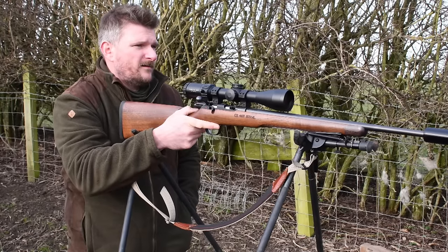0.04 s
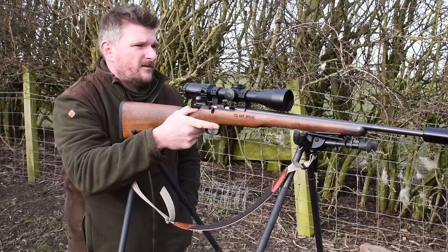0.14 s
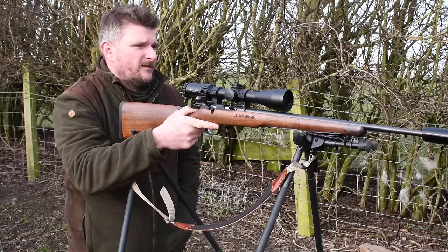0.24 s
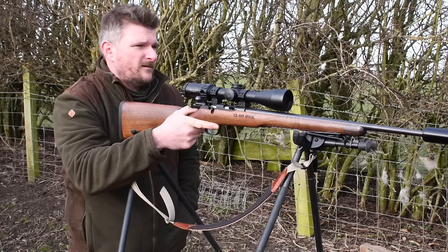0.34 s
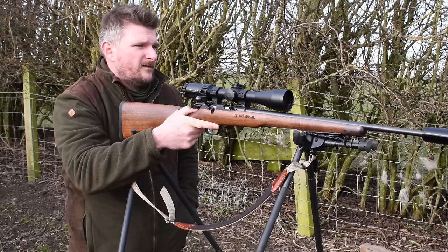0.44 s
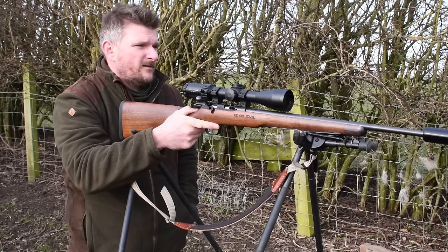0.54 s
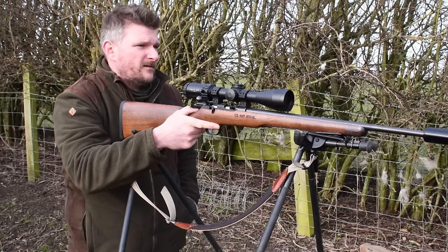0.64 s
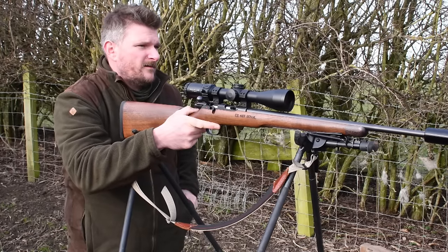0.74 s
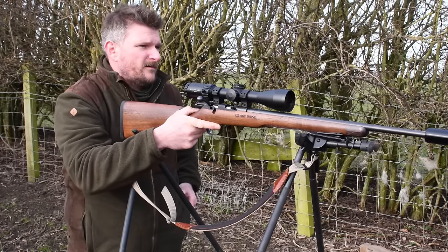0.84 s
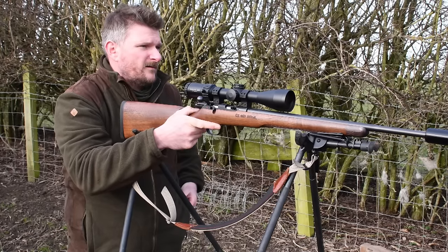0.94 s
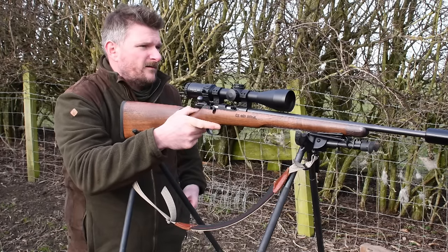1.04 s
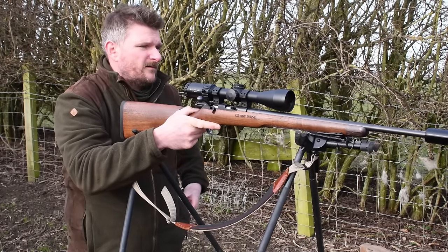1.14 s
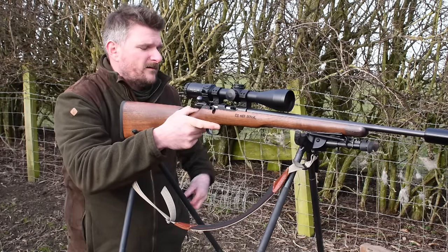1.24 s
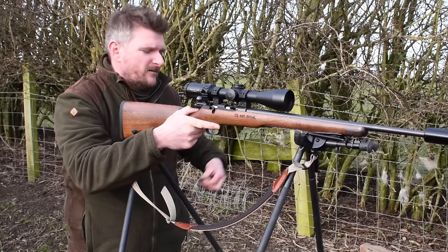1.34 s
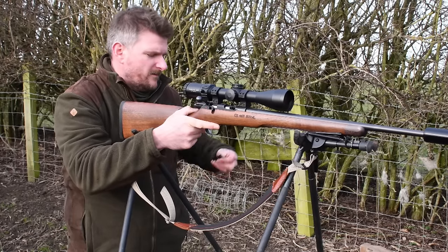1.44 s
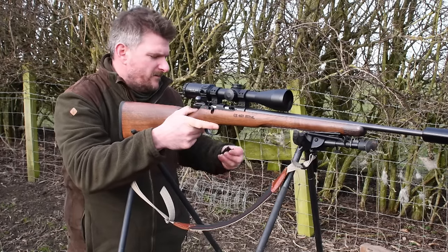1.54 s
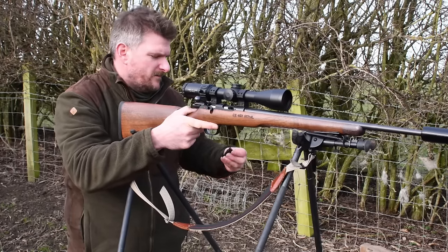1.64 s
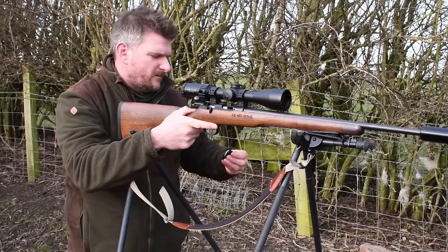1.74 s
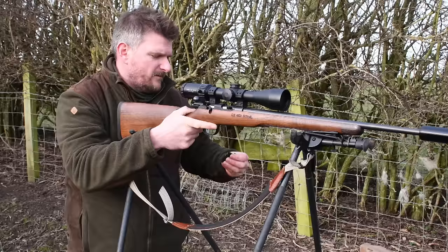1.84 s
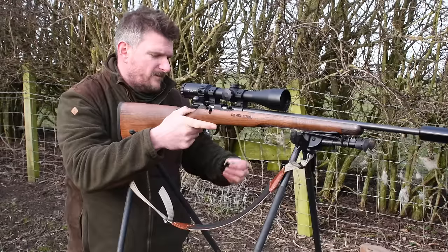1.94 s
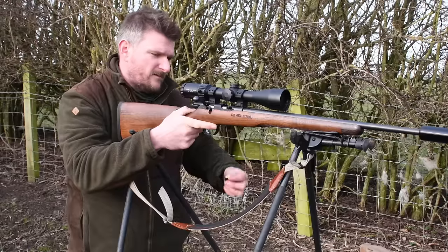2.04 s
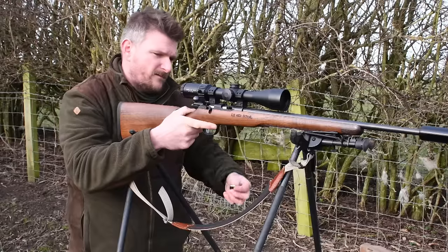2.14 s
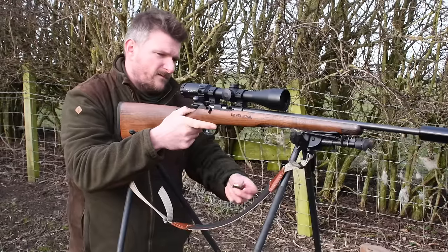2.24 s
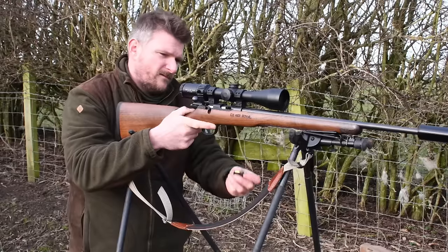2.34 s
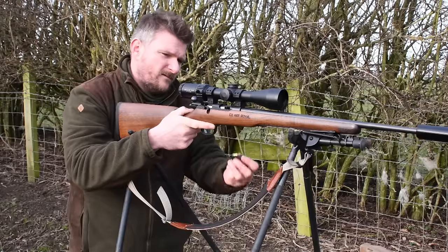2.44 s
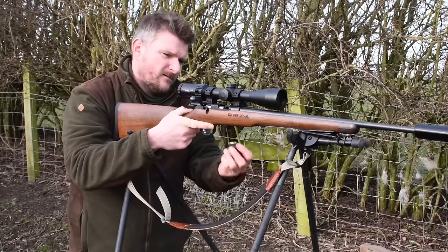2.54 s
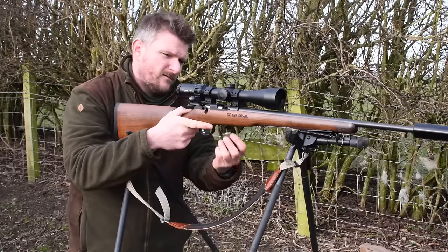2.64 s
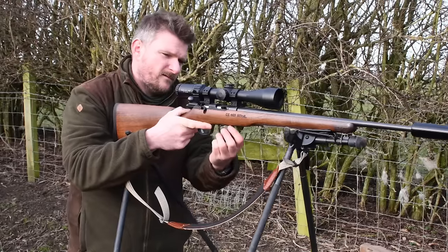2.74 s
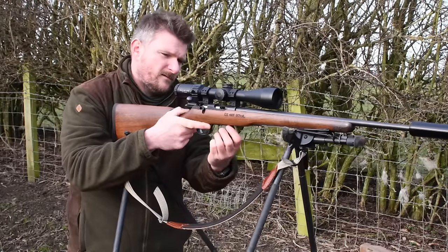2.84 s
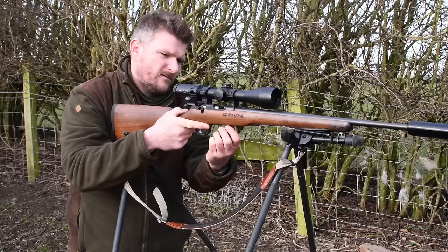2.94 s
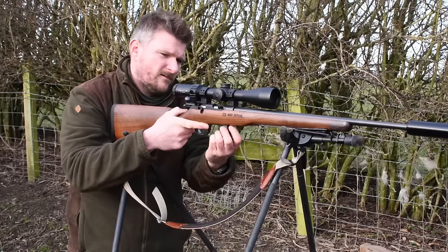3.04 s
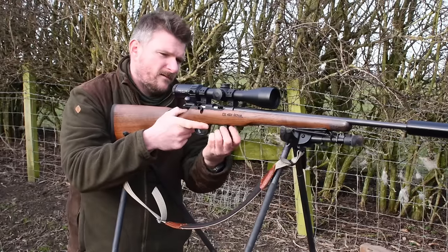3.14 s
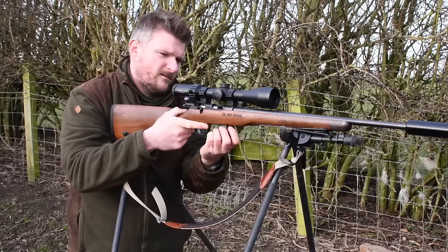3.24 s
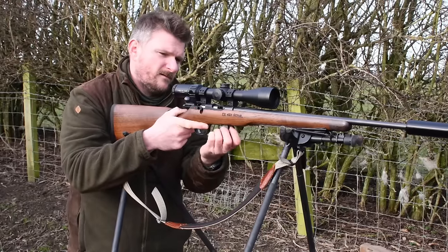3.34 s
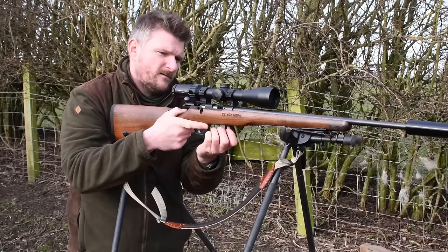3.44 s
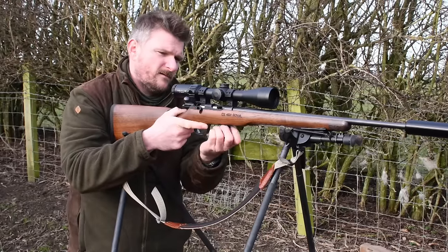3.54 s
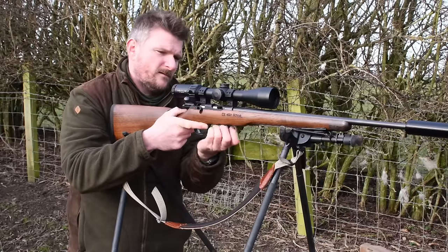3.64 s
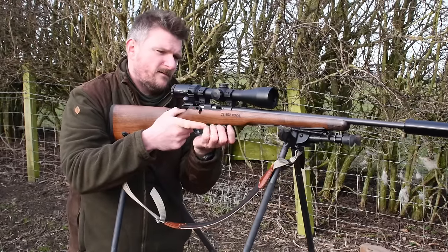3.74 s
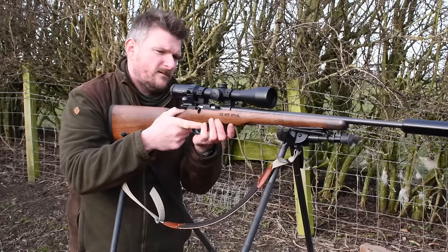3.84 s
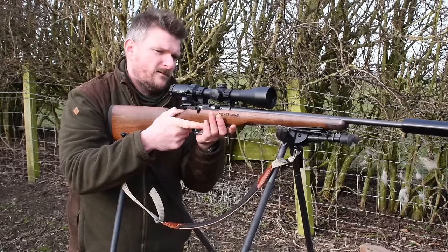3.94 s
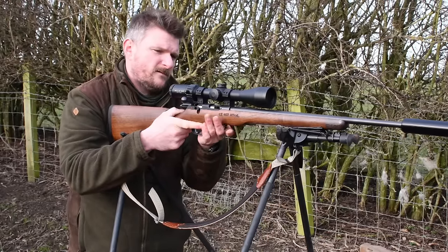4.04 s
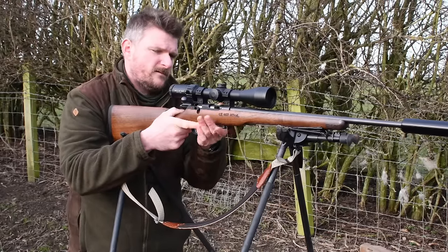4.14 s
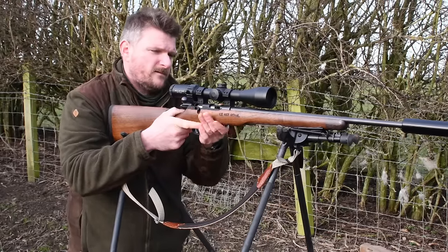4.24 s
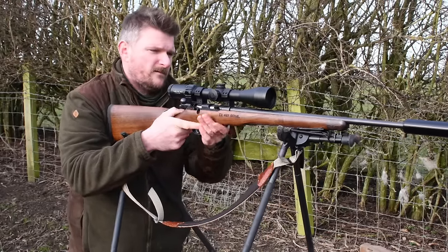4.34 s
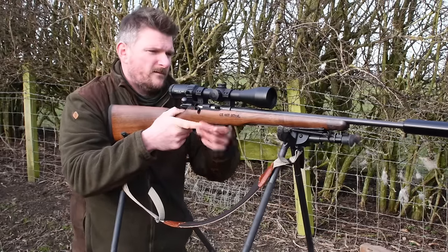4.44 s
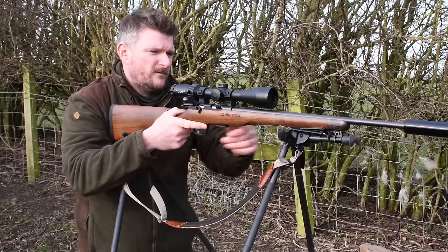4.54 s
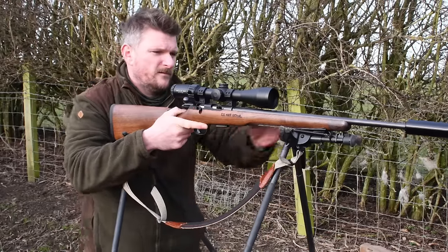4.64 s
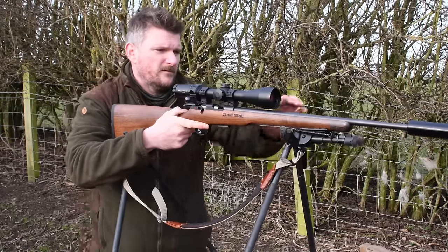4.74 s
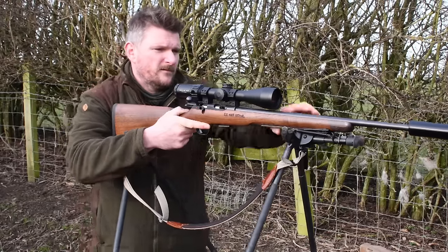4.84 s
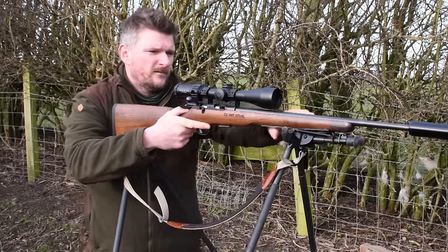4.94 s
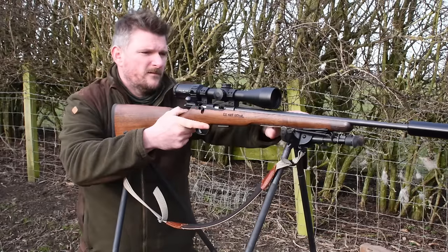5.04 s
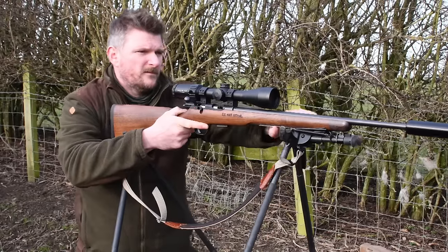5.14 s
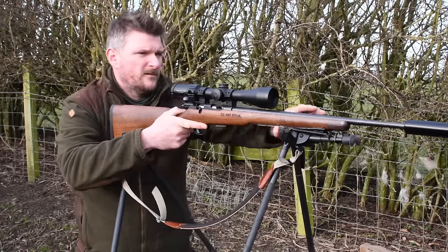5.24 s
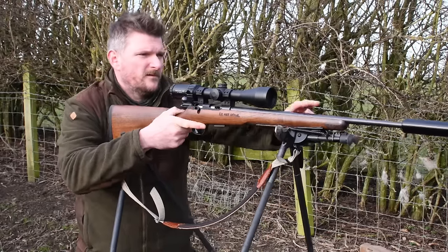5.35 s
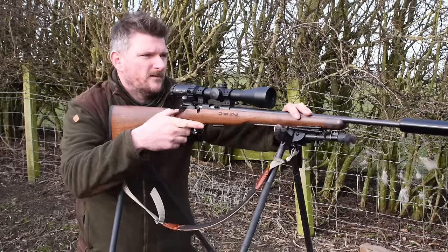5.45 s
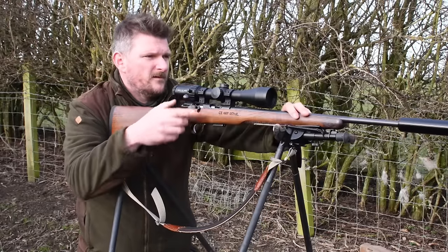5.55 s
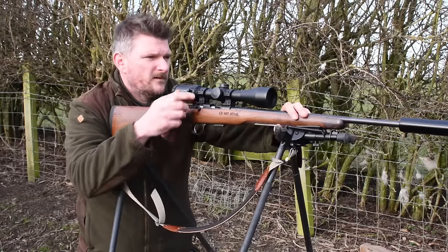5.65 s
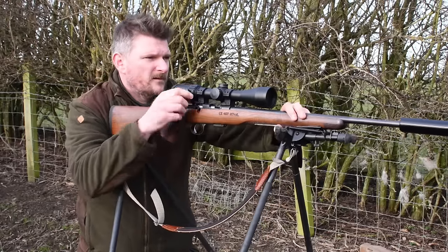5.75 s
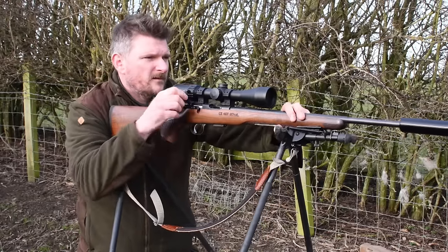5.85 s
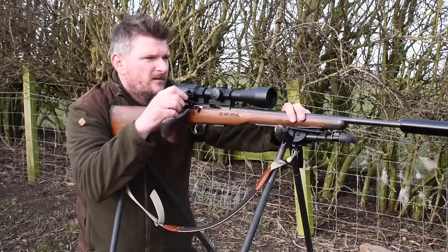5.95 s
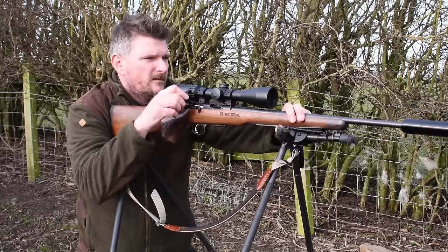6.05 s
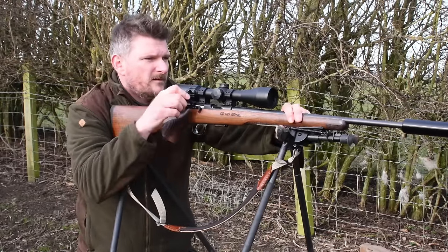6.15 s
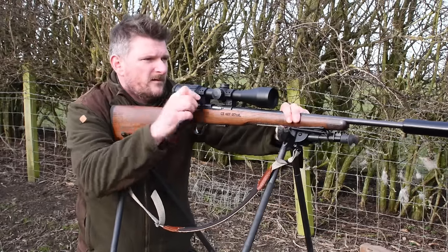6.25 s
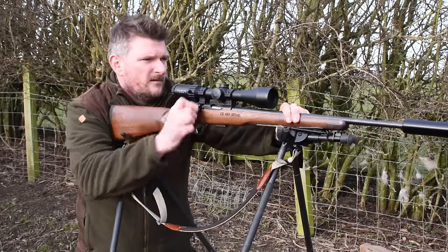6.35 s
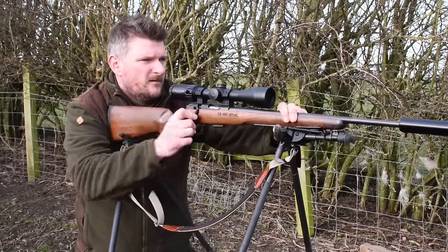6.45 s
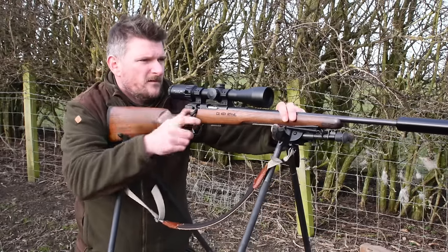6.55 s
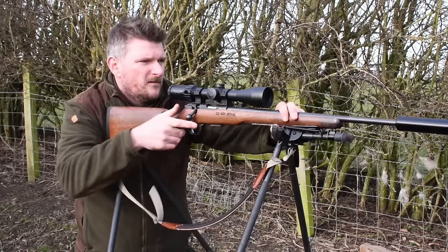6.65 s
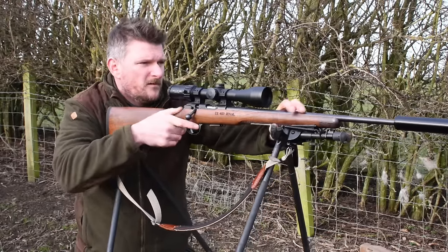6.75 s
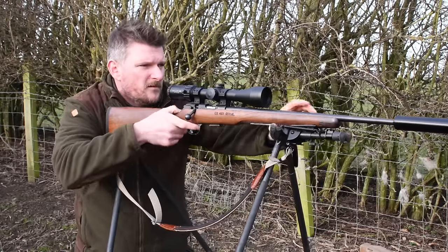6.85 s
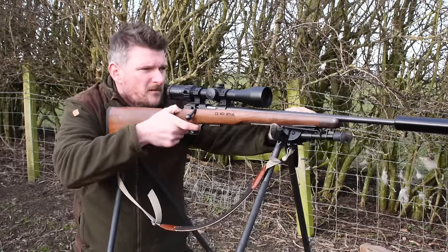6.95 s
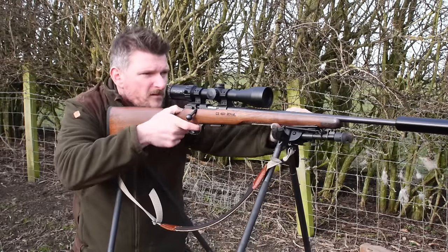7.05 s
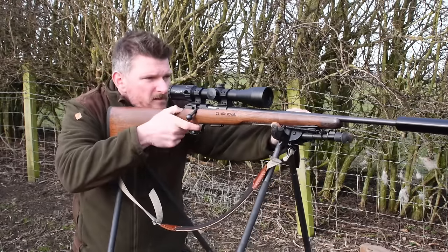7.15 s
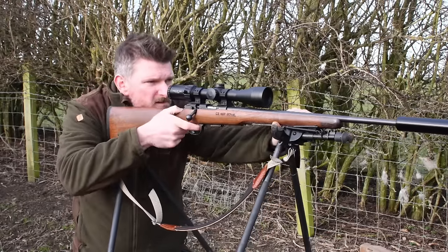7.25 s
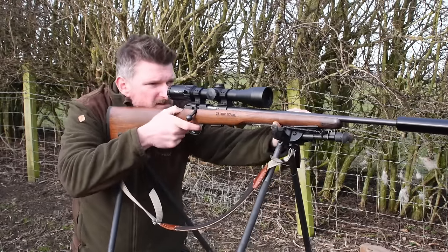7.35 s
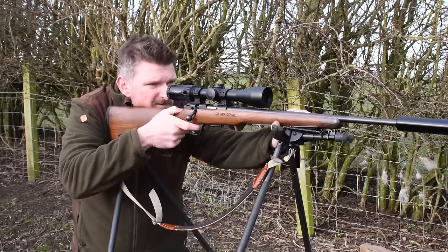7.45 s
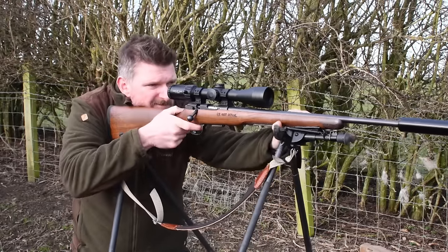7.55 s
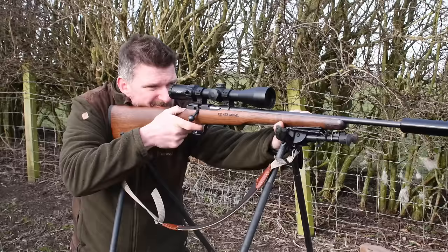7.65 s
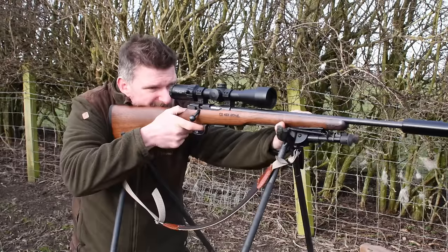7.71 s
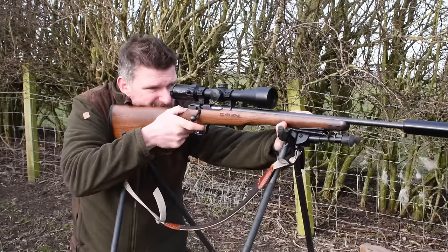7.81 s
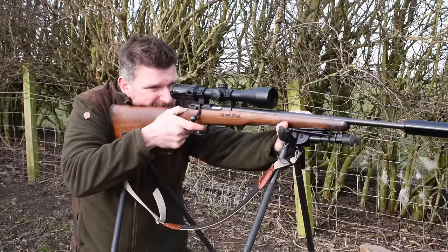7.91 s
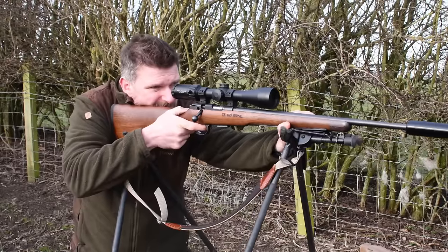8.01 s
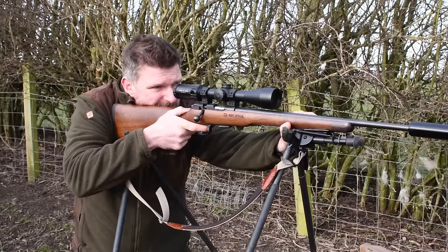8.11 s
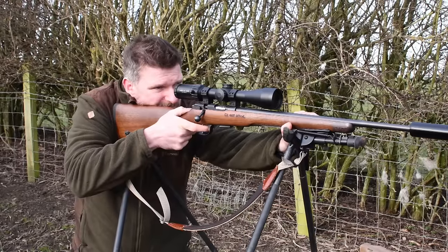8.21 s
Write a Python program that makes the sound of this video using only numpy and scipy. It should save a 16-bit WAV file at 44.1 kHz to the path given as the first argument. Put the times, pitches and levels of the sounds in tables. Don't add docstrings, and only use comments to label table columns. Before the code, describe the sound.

Close stereo microphones catch delicate metal handling in open air: tiny ticks, dull pocket clunks, thin scrapes and fumbling, then a bright latch snap. Hands brush the gun; a loud steel clack marks the bolt reaching its rear stop, followed by a short scrape, a sharp slam and a lighter handle knock. Short ground and hedge reflections surround them, above soft cloth rustle and low traffic. No shot is heard.

```python
import sys
import numpy as np
from scipy import signal
from scipy.fft import rfft, irfft, next_fast_len
from scipy.io import wavfile
from scipy.ndimage import uniform_filter1d

SR = 44100
rng = np.random.default_rng(int(sys.argv[2]) if len(sys.argv) > 2 else 0)


def generate_wav(sig):
    pcm = np.round(np.clip(np.atleast_2d(sig).T, -1, 1) * 32767).astype(np.int16)
    wavfile.write(sys.argv[1], SR, pcm)


def nominal_scale(level):
    x = np.asarray(level, float) / 20
    return 10 ** x


N = 365148

# start_s, level_db, pitch_hz, focus_db
ROUNDS = [
    (0.1621, -56, 4000, 4),
    (0.1665, -57.5, 3500, 2.7),
    (0.2835, -59, 2930, 3),
    (0.2945, -62, 2400, 2.6),
]
# start_s, level_db, pitch_hz, focus_db
POCKET = [
    (0.5246, -57, 1400, 4),
    (0.7535, -48.5, 930, 9.5),
    (0.7575, -47, 750, 7),
    (0.7825, -51.5, 1190, 7),
    (0.7952, -50, 1600, 4.4),
    (0.8, -56, 700, 7),
    (1.2091, -67, 1150, 3),
    (1.3431, -66, 3480, 2.4),
    (1.392, -57.5, 5000, 5),
]
# start_s, level_db, pitch_hz, focus_db
FUMBLE = [(2.8598, -53, 3050, 5), (3.0336, -49.5, 1400, 4.2), (3.0876, -60, 2380, 1.8),
          (3.2702, -68, 3360, 1), (3.4202, -54.5, 2820, 4.7), (3.6251, -55, 2140, 2.1),
          (3.6386, -45, 2200, 1.1), (3.6525, -57, 5000, 3), (3.6618, -51, 1600, 9.4),
          (3.7095, -60, 1040, 7), (3.8012, -54, 1310, 4.4), (3.8216, -53, 3730, 6.1)]
# start_s, level_db, pitch_hz, focus_db
SEATING = [
    (3.9645, -70, 3480, 4),
    (3.9903, -55, 3030, 1.3),
    (4.0078, -67, 2500, 2.6),
    (4.0622, -59, 4000, 1),
    (4.0678, -56, 1930, 3.6),
    (4.07, -63, 3000, 2),
    (4.2354, -59, 1870, 7.5),
    (4.2432, -48, 2280, 3.6),
]
# start_s, level_db, pitch_hz, focus_db
LATCH = [
    (4.3222, -59, 3140, 5),
    (4.3267, -55, 2300, 4),
    (4.3512, -42.5, 4500, 0),
    (4.3524, -47, 2500, 2),
    (4.3605, -55.5, 3500, -1),
    (4.3686, -26, 4800, 1.5),
    (4.3758, -46, 7500, 3),
]
# start_s, level_db, pitch_hz, focus_db
GRIP = [(4.5897, -56.5, 6500, 1.5), (4.8122, -63, 7500, 2.3), (4.812, -60, 650, 8.8), (4.836, -67, 6500, 3),
        (4.8841, -61, 2140, 4.7), (4.8905, -60, 7500, 2), (4.9065, -61, 5000, 0.91),
        (4.9195, -55, 2550, 2.5), (4.9255, -56, 3000, 1.7), (5.0844, -66, 4500, 3), (5.2124, -65, 7500, 4),
        (7.9073, -50, 1900, 10.7)]
# start_s, level_db, pitch_hz, focus_db
BOLT_BACK = [
    (5.8293, -51, 1570, 3.9),
    (5.9069, -55.5, 1500, 11),
    (5.9219, -44, 1927, 3.4),
    (5.9308, -36, 3480, 2.6),
    (5.9361, -50, 3610, 3.0),
    (5.9415, -52.5, 3000, 5),
    (5.9518, -58, 6000, 1.5),
    (5.9571, -30, 3490, 2.3),
    (5.9586, -17, 2460, 2.96),
]
# start_s, level_db, pitch_hz, focus_db
BOLT_START = [
    (6.2687, -40.5, 2580, 8.5),
    (6.2708, -46.5, 2200, 8),
    (6.2887, -44.5, 2500, 12),
]
# start_s, level_db, pitch_hz, focus_db
BOLT_HOME = [(6.3078, -45.5, 7000, 2), (6.3056, -40.5, 6500, 1.5), (6.3152, -40, 2400, 4.9),
             (6.321, -39, 5000, 2), (6.3224, -30, 3000, 3.4), (6.3248, -36, 2600, 3.5),
             (6.3288, -38, 2500, 5), (6.3386, -38, 5000, 1), (6.3441, -17.5, 3700, 1.9),
             (6.3455, -23, 3200, 3), (6.3466, -25, 2800, 3)]
# start_s, level_db, pitch_hz, focus_db
HANDLE_DOWN = [
    (6.4383, -42.5, 1370, 6.1),
    (6.4601, -58, 1570, 5.4),
    (6.4739, -52, 2860, 5.8),
    (6.5195, -28.5, 3000, 0.77),
]

# start_s, level_db, pitch_hz, length_ms
ROUNDS_SLIDES = [
    (0.167, -63, 2800, 50),
    (0.245, -59, 2600, 32.2),
    (0.274, -56, 2400, 26),
    (0.3, -64.5, 1930, 40),
]
# start_s, level_db, pitch_hz, length_ms
POCKET_SLIDES = [
    (0.515, -64.5, 1150, 25),
    (0.746, -60, 1100, 8),
    (0.76, -66, 1800, 13),
    (0.784, -56.5, 850, 30),
    (0.813, -59.5, 900, 27),
    (0.84, -67, 900, 30),
    (1.35, -65, 900, 67),
]
# start_s, level_db, pitch_hz, length_ms
FUMBLE_SLIDES = [(2.9, -73.5, 1000, 100), (3.13, -67.5, 1040, 54), (3.19, -78, 1740, 120),
                 (3.405, -63.5, 1050, 27), (3.49, -60, 1060, 63), (3.54, -69, 810, 33),
                 (3.642, -52, 1800, 7.7), (3.651, -45, 1800, 12.5), (3.667, -67, 1300, 35),
                 (3.738, -64, 1400, 12), (3.753, -65, 850, 11), (3.764, -58, 1260, 13),
                 (3.8, -54.5, 1500, 14), (3.812, -64, 1800, 45), (3.85, -57, 2600, 31),
                 (3.878, -54, 1490, 21), (3.9, -73, 1100, 7.5), (5.43, -73, 1410, 160)]
# start_s, level_db, pitch_hz, length_ms
SEATING_SLIDES = [
    (3.905, -65, 3300, 24),
    (3.935, -63, 4000, 41),
    (3.995, -65, 4000, 30),
    (4.004, -63, 2000, 6.4),
    (4.02, -64.5, 4500, 50),
    (4.06, -55.5, 1800, 15),
]
# start_s, level_db, pitch_hz, length_ms
LATCH_SLIDES = [
    (4.336, -46.5, 1500, 22),
    (4.3425, -46.5, 2400, 12),
    (4.354, -55, 1500, 11.3),
]
# start_s, level_db, pitch_hz, length_ms
GRIP_SLIDES = [
    (4.61, -73, 2500, 130),
    (4.74, -75, 3000, 200),
    (4.885, -58, 2110, 41),
    (4.914, -54.5, 2340, 14),
    (4.94, -71, 2000, 170),
    (5.12, -67, 6000, 62),
    (6.8, -75, 2640, 60),
    (7.55, -70, 1000, 74),
    (7.86, -71.5, 2000, 74),
    (7.99, -74, 4000, 64),
]
# start_s, level_db, pitch_hz, length_ms
BOLT_SLIDES = [
    (6.272, -53.5, 1590, 15),
    (6.288, -54.5, 2400, 18),
    (6.303, -38, 2460, 8.1),
    (6.31, -39.5, 2600, 12),
    (6.324, -38, 2600, 11),
    (6.334, -41, 2800, 12),
]
# start_s, level_db, pitch_hz, length_ms
SQUEAK = [
    (6.648, -62, 1500, 16.5),
]

# pitch_hz, width_hz, level_db
ROUNDS_BODY = [(1150, 210, -6), (1570, 160, 0), (2180, 360, -5), (2800, 250, 2), (3290, 450, -5.5),
               (5100, 400, -3), (6500, 33, 10), (8500, 810, -16)]
# pitch_hz, width_hz, level_db
POCKET_BODY = [(550, 93, -2), (760, 120, -1), (1040, 120, -1), (1300, 84, 4.5), (1570, 150, -2),
               (1820, 200, -7), (2500, 660, -9.5), (4000, 620, -5.5), (5770, 900, -9), (8500, 800, -27)]
# pitch_hz, width_hz, level_db
MAGAZINE_BODY = [(750, 67, 3.5), (898, 58, 5), (1000, 145, 0.5), (1400, 88, 8.5), (1920, 110, -1.5),
                 (3000, 260, -6.5), (4000, 880, -19.5), (5070, 540, -4.5), (6370, 410, -12),
                 (8630, 430, -1.5), (11700, 900, -31)]
# pitch_hz, width_hz, level_db
SEATING_BODY = [(900, 350, -9), (1310, 84, -3), (1900, 99, 3), (2230, 210, -2), (3000, 320, -4.5),
                (3600, 390, -17), (4380, 220, -7), (4920, 320, -5.5), (5530, 240, -7), (6840, 600, -24),
                (8400, 420, -2.5), (9300, 400, -2), (13000, 900, -27)]
# pitch_hz, width_hz, level_db
DRAG_BODY = [(1000, 160, -8), (1400, 120, 1), (1900, 160, 2.5), (3000, 270, -3), (4200, 350, -5),
             (5100, 450, -10), (7700, 500, -8.5), (8700, 500, -5.5)]
# pitch_hz, width_hz, level_db
LATCH_BODY = [(1800, 170, -2.5), (2140, 190, -1.5), (3030, 210, -2.5), (4120, 160, -3.5), (4870, 230, 5),
              (5760, 390, 0), (6510, 290, 4.5), (7500, 270, -15), (9160, 400, -6), (10300, 500, -14.5),
              (12330, 550, -3), (13000, 400, 0.5),
              (770, 150, -17), (1330, 130, -11), (1530, 80, -13), (2420, 220, -4), (8350, 250, -10),
              (6503, 35, -10), (6550, 41, -6.5), (8230, 45, -20.5), (4400, 220, -9), (11500, 300, -15),
              (14200, 300, -15)]
# pitch_hz, width_hz, level_db
GRIP_BODY = [(680, 530, 5), (1400, 380, -3.5), (2200, 1150, 0.5), (3200, 2700, -6), (4970, 940, -6),
             (6500, 2000, -11), (8600, 670, -7)]
# pitch_hz, width_hz, level_db
BACK_BODY = [(1914, 66, -0.5), (2430, 200, 2), (3000, 440, 1.5), (5200, 96, -8), (7540, 290, -24),
             (8400, 310, -7.5), (9700, 550, -25), (10300, 230, -21), (11000, 280, -31), (11900, 210, -28.5),
             (13050, 250, -14), (14500, 270, -30.5),
             (727, 87, 1.5), (920, 90, -12.5), (1090, 64, -11.5), (1330, 42, -2.5), (1520, 78, -6),
             (2186, 150, -6.5), (3420, 53, -4), (3540, 32, -2.5), (4190, 200, -1.5), (4500, 500, -5),
             (5670, 150, -12), (5930, 150, -10.5), (6600, 400, -21)]
# pitch_hz, width_hz, level_db
HOME_BODY = [(1930, 110, -6.5), (2650, 160, 0), (3066, 120, 2), (3910, 100, -0.5), (4420, 230, -3),
             (5000, 220, 0.5), (6500, 250, -7.5), (8330, 250, -5), (10150, 110, -20.5), (11900, 540, -15.5),
             (12900, 420, -17), (14500, 440, -13),
             (742, 96, -10.5), (960, 100, -12.5), (1300, 130, -12), (1500, 52, -8), (2140, 200, -9.5),
             (5527, 150, -1), (6000, 200, -7.5), (7100, 300, -13.5), (7650, 310, -10.5), (8930, 200, -10),
             (9550, 200, -17.5)]
# pitch_hz, width_hz, level_db
DOWN_BODY = [(1236, 190, 4.5), (1450, 250, 4.5), (2070, 105, 1.5), (2380, 95, -2), (2860, 114, -5),
             (4200, 250, -18), (4820, 170, -9), (5530, 310, -10.5), (6100, 200, -13), (7550, 303, -7.5),
             (7750, 250, -2.5), (8400, 110, -2), (9550, 350, -21.5), (11800, 500, -22.5),
             (588, 71, 5.5), (810, 100, -1), (3950, 170, -16.5), (6560, 330, -17.5), (13490, 600, -16.5),
             (15000, 300, -28)]
# pitch_hz, width_hz, level_db
SQUEAK_BODY = [(1500, 96, 4.5), (3980, 270, -22)]

# start_s, pitch_hz, peak_db, t60_s
THUDS = [
    (0.813, 332, -51.5, 0.043),
    (4.922, 310, -51, 0.045),
    (5.961, 265, -43, 0.049),
    (6.344, 259, -44.5, 0.061),
    (6.519, 244.4, -51, 0.068),
]

# low_hz, high_hz
PART_EDGES_HZ = [(480, 1200), (1200, 2800), (2800, 6500), (6500, 15200)]
PART_LAG = [-42, -6, 14, 24]
PART_GAIN_DB = [0.33, 2.2, 1.4, 0.3]

# pitch_hz, level_db
AIR_MID = [(12, -50.5), (20, -21), (26, -42.5), (44, -7), (65, -0.5), (165, -3.5), (314, -11), (361, -12.5),
           (404, -14), (583, -12), (1240, -19.5), (1650, -22.5), (15200, -26), (16500, -40.5)]
# pitch_hz, level_db
AIR_SIDE = [(12, -46.5), (20, -19), (79, -3.5), (184, -3), (251, -2.5), (729, -4.5), (816, -4), (913, -5),
            (1790, -7), (15600, -9.5), (16300, -28.5)]
# start_s, traffic_db, fleece_db
SWELL = [(0, -1, -70.5), (.6, 0, -70.5), (1, -0.5, -76), (1.5, -0.5, -87), (2, -1, -85), (2.6, 0, -75.5),
         (3, -1, -74.5), (4, -0.5, -76.5), (4.5, -1.5, -67), (5.1, 0, -67.5), (5.5, -0.5, -68),
         (5.999, -2, -71), (6.7, 0, -70.5), (7.1, -0.5, -71.5), (7.6, 0.5, -88), (7.999, -1, -68.5),
         (8.28, 2.5, -77.5)]
# pitch_hz, level_db
TYRES = [(200, -26.0), (450, -0.5), (1100, 6.5), (2500, -29.5)]
# pitch_hz, level_db
FLEECE = [(200, -6.0), (900, 1.5), (3000, -5.5), (8000, -12.5), (12000, -42.0)]

MID_DB, SIDE_DB = -60, -65.5
LATCH_MS, BACK_MS, HOME_MS, DOWN_MS, FINGER_MS = 0.42, 0.51, 0.47, 0.4, 0.815
LIGHT_SHARE = 0.17
CATCH, SLIDE_FADE_DB, JERK_DB, SLIDE_FOCUS_DB = 0.67, 1.5, 2.5, 3
FALL_POWER, FALL_BELOW = 1.88, 2.07
GROUND_S, GROUND_DB = 0.0079, -17.5
FAR_S, FAR_DB = 0.052, -40.5
HEDGE_T60_S, HEDGE_DB, HEDGE_SIDE_DB = 0.11, -15, -41.5
TREMBLE_HZ, TREMBLE_RAD, RETURN_LOW_HZ = 400, 0.8, 450


def colour(x, points):
    hz, db = np.transpose(points)
    f = np.arange(len(x) // 2 + 1) * SR / len(x) + 1
    return irfft(rfft(x) * nominal_scale(np.interp(np.log(f), np.log(hz), db)), len(x))


def level(x, db):
    return x * nominal_scale(db) / np.sqrt(np.mean(x ** 2))


def air():
    s, swell_db, fleece_db = np.transpose(SWELL)
    t = np.arange(N) / SR
    mid, side, cloth = rng.standard_normal((3, N))
    mid = level(colour(mid, AIR_MID), MID_DB)
    side = level(colour(side, AIR_SIDE), SIDE_DB)
    swell = nominal_scale(np.interp(t, s, swell_db)) - 1
    grip = np.repeat(rng.standard_normal(N // 1000 + 1), 1000)[:N]
    grip = uniform_filter1d(grip, size=1000)
    fleece = level(colour(cloth, FLEECE), 0) * nominal_scale(3.3 * grip)
    fleece = fleece * nominal_scale(np.interp(t, s, fleece_db))
    return mid + swell * colour(mid, TYRES) + fleece, side + swell * colour(side, TYRES)


def ring(body, chance):
    hz, width, db = np.transpose(sorted(body))[:, :, None]
    width = width * (1 + hz / 13000)
    t, k = np.arange(SR // 8) / SR, len(body)
    hz = hz * (1 + .004 * chance[:k, None])
    sense = (-1) ** np.arange(k)[:, None]
    gain = sense * nominal_scale(db + .8 * chance[k:2 * k, None]) * 2 * np.pi * width / SR
    decay = np.exp(-np.pi * np.maximum(width, 25) * t)
    return np.sum(gain * np.sin(2 * np.pi * hz * t) * decay, axis=0)


def drive(db, centre_hz, focus_db):
    octaves = np.log2(np.sqrt(np.prod(PART_EDGES_HZ, axis=1)) / centre_hz)
    slope = focus_db * np.where(octaves < 0, FALL_BELOW, 1)
    return db - slope * np.abs(octaves) ** FALL_POWER + PART_GAIN_DB


def slide_push(draw, t):
    slips = draw + CATCH * draw ** 3
    push = np.sin(np.pi * np.minimum(t / 1.05, 1)) ** .4 * slips * nominal_scale(-SLIDE_FADE_DB * t)
    jerks = uniform_filter1d(np.repeat(draw[:99], 130), size=60)[:len(push)]
    return push * nominal_scale(JERK_DB * jerks)


def blow_push(draw, t):
    shape = ((1 - np.exp(-3 * t)) * np.exp(-.9 * t))[:1024] + 1e-9
    push = shape * draw[:1024]
    for _ in range(5):
        grit = rfft(push)
        push = irfft(grit / np.abs(grit)) * shape ** .2
    return push


def contacts(rows, body, blow_ms, crack_db, edge_hz=16000, stock_db=0):
    sliding = blow_ms is None
    out = np.zeros(N + SR)
    hardest_db = max(row[1] for row in rows)
    chance = rng.standard_normal((len(rows), SR // 4))
    parts = [signal.butter(3, edges, "bandpass", fs=SR, output="sos") for edges in PART_EDGES_HZ]
    dulling = signal.butter(2, edge_hz, fs=SR, output="sos")
    for (s, strength_db, centre_hz, last), draw in zip(rows, chance):
        if sliding:
            ms, focus_db = last, SLIDE_FOCUS_DB
        else:
            ms, focus_db = blow_ms * nominal_scale(LIGHT_SHARE * (strength_db - hardest_db)), last
        t = np.arange(len(draw)) / (SR * ms / 1000)
        push = slide_push(draw, t) if sliding else blow_push(draw, t)
        response = ring(body, draw[::-1])
        crack = signal.lfilter([1], [1, -.5], draw[-200:] * np.exp(-np.arange(200) / 25))
        response[:200] += nominal_scale(crack_db) * crack / 3
        sound = signal.fftconvolve(push[:SR // 4 - 999], response)[:SR // 3]
        sound = signal.sosfilt(dulling, sound)
        start = int(s * SR) - 30
        part_db = drive(strength_db, centre_hz, focus_db) + [stock_db, 0, 0, 0]
        for sos, lag, db in zip(parts, PART_LAG, part_db):
            part = signal.sosfilt(sos, sound)
            size = np.std(part[:int((ms if sliding else 6) * SR / 1000)])
            out[start + lag:start + lag + len(part)] += part * nominal_scale(db) / size
    return out[:N]


def loose_rounds():
    return (contacts(ROUNDS, ROUNDS_BODY, FINGER_MS, crack_db=-24)
            + contacts(ROUNDS_SLIDES, ROUNDS_BODY, None, crack_db=-16))


def pocket():
    return (contacts(POCKET, POCKET_BODY, FINGER_MS, crack_db=-29.0)
            + contacts(POCKET_SLIDES, POCKET_BODY, None, crack_db=-9))


def tripod():
    out, t = np.zeros(N), np.arange(SR // 8) / SR
    for s, hz, db, t60 in THUDS:
        swing = np.sin(2 * np.pi * hz * t) + 0.96 * np.sin(2 * np.pi * 1.5 * hz * t)
        knock = swing * (1 - np.exp(-t / 0.0038)) * np.exp(-np.log(1000) * t / t60)
        out[int(s * SR):int(s * SR) + len(t)] += nominal_scale(db) * knock / np.max(np.abs(knock))
    return out


def fumble():
    return (contacts(FUMBLE, MAGAZINE_BODY, FINGER_MS, crack_db=-20.0)
            + contacts(FUMBLE_SLIDES, MAGAZINE_BODY, None, crack_db=-19.5))


def seating():
    return (contacts(SEATING, SEATING_BODY, FINGER_MS, crack_db=-18.0)
            + contacts(SEATING_SLIDES, SEATING_BODY, None, crack_db=-14, stock_db=-2.5))


def latch():
    return (contacts(LATCH, LATCH_BODY, LATCH_MS, crack_db=-26.5, stock_db=-13)
            + contacts(LATCH_SLIDES, DRAG_BODY, None, crack_db=-40))


def grip():
    return (contacts(GRIP, GRIP_BODY, FINGER_MS, crack_db=-27.5)
            + contacts(GRIP_SLIDES, GRIP_BODY, None, crack_db=-12.5))


def bolt_back():
    return contacts(BOLT_BACK, BACK_BODY, BACK_MS, crack_db=-17.5, edge_hz=10500)


def bolt_home():
    body = HOME_BODY
    return (contacts(BOLT_START, body, HOME_MS, crack_db=-30, edge_hz=4000)
            + contacts(BOLT_SLIDES, body, None, crack_db=-18)
            + contacts(BOLT_HOME, body, HOME_MS, crack_db=-24.5, edge_hz=13000))


def handle_down():
    return contacts(HANDLE_DOWN, DOWN_BODY, DOWN_MS, crack_db=-30, edge_hz=9700)


def squeak():
    return contacts(SQUEAK, SQUEAK_BODY, None, crack_db=-47, stock_db=-12)


def rifle():
    return (loose_rounds() + pocket() + tripod() + fumble() + seating() + latch() + grip()
            + bolt_back() + bolt_home() + handle_down() + squeak())


def outdoors(x):
    t = np.arange(SR // 5) / SR
    grains = rng.standard_normal((4, len(t)))[:3]
    bounce = grains[0] * np.exp(-((t - GROUND_S) / 0.002) ** 2)
    far = grains[2] * np.exp(-((t - FAR_S) / 0.003) ** 2)
    scatter = grains[1:] * np.exp(-np.log(1000) * t / HEDGE_T60_S) * (1 - np.exp(-t / 0.0019))
    scatter = signal.lfilter([1], [1, -.35], scatter)
    unit = np.sqrt(np.sum(scatter[0] ** 2))
    mid = nominal_scale(GROUND_DB) * bounce / np.sqrt(np.sum(bounce ** 2))
    mid = mid + nominal_scale(HEDGE_DB) * scatter[0] / unit
    mid = mid + nominal_scale(FAR_DB) * far / np.sqrt(np.sum(far ** 2))
    side = nominal_scale(HEDGE_DB + HEDGE_SIDE_DB) * scatter[1] / unit
    slow = signal.butter(2, TREMBLE_HZ, fs=SR, output="sos")
    tremble = level(signal.sosfilt(slow, rng.standard_normal(N)), 0)
    turning = signal.hilbert(x, next_fast_len(N))[:N] * np.exp(1j * TREMBLE_RAD * tremble)
    blurred = signal.fftconvolve(np.real(turning), mid)[:N]
    blurred = signal.sosfilt(signal.butter(2, RETURN_LOW_HZ, "highpass", fs=SR, output="sos"), blurred)
    early = nominal_scale(-35) * np.gradient(x)
    return x + blurred, signal.fftconvolve(x, side)[:N] + early


def scene():
    mid, side = np.add(outdoors(rifle()), air())
    return np.array([mid + side, mid - side])


def top_cut(x):
    return signal.sosfilt(signal.butter(12, 16820, fs=SR, output="sos"), x)


def record(dry):
    return top_cut(dry)


dry = scene()
out = record(dry)
generate_wav(out)
```